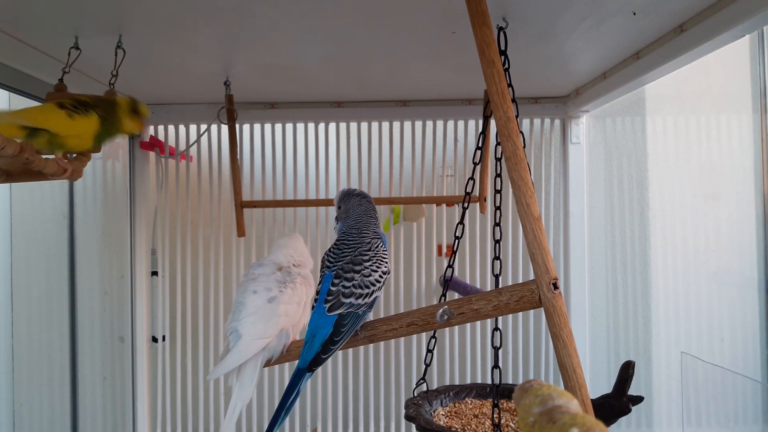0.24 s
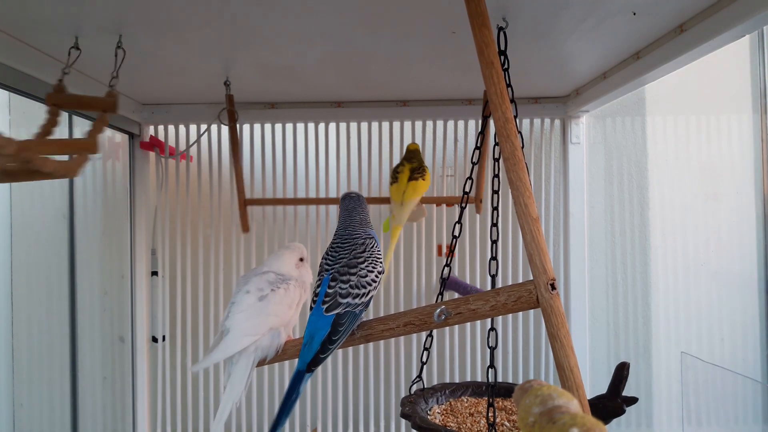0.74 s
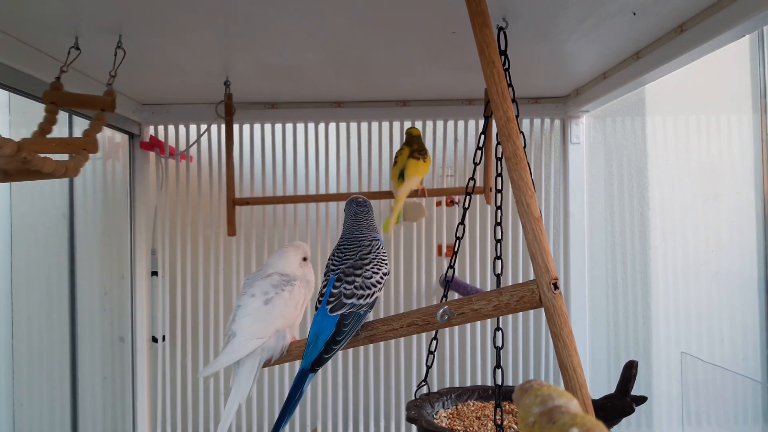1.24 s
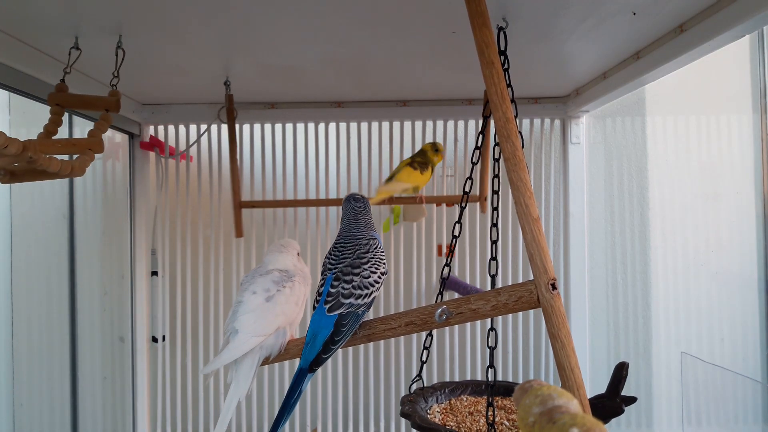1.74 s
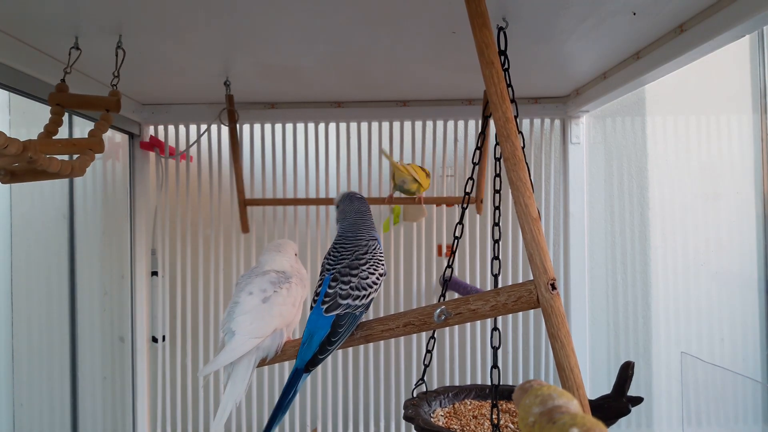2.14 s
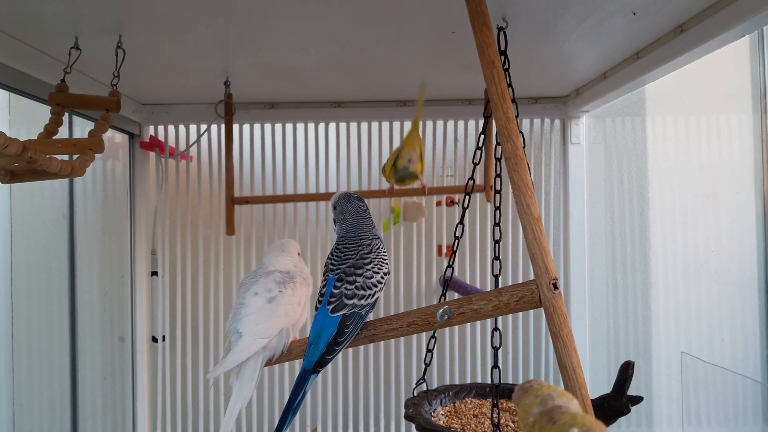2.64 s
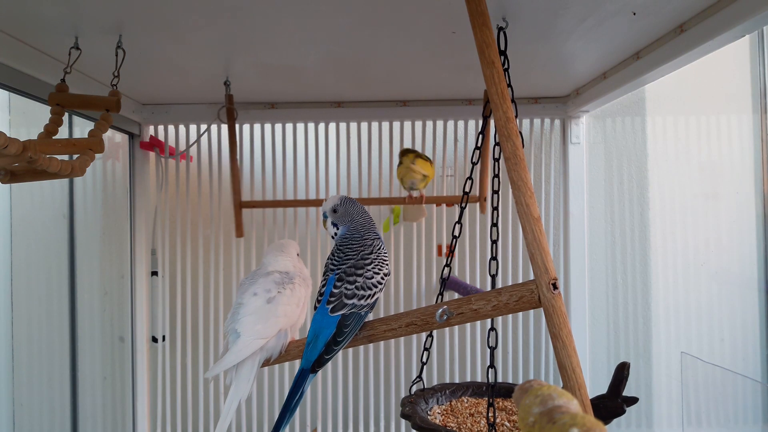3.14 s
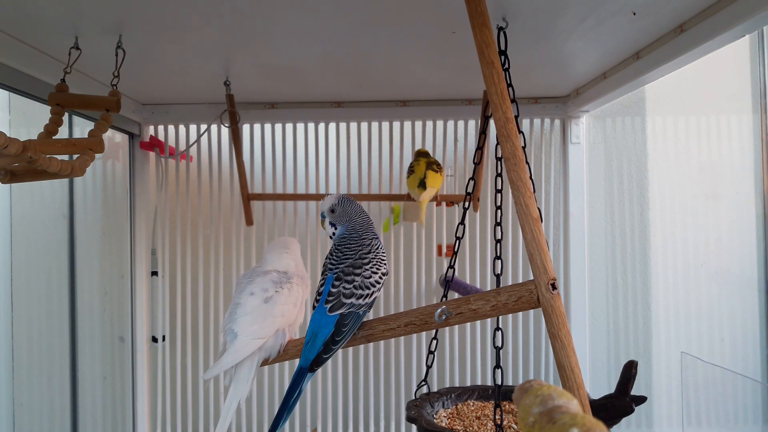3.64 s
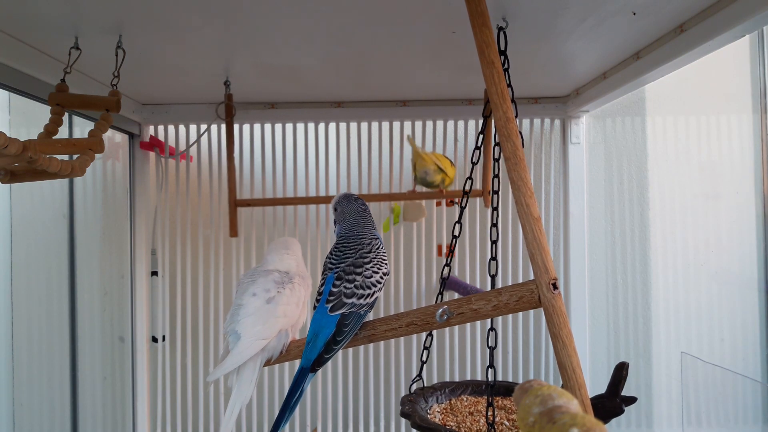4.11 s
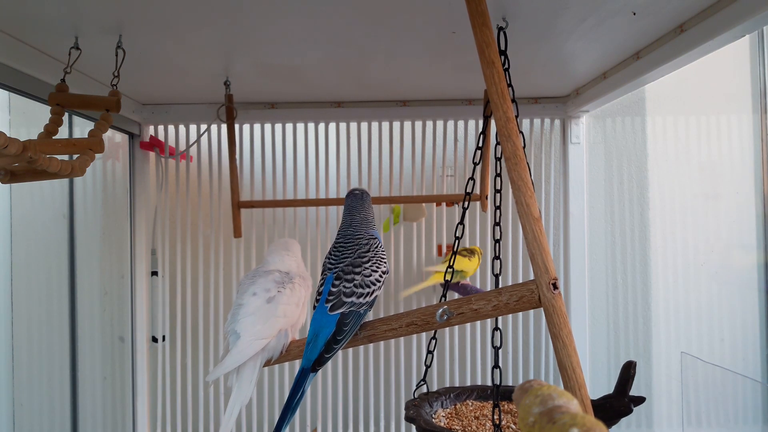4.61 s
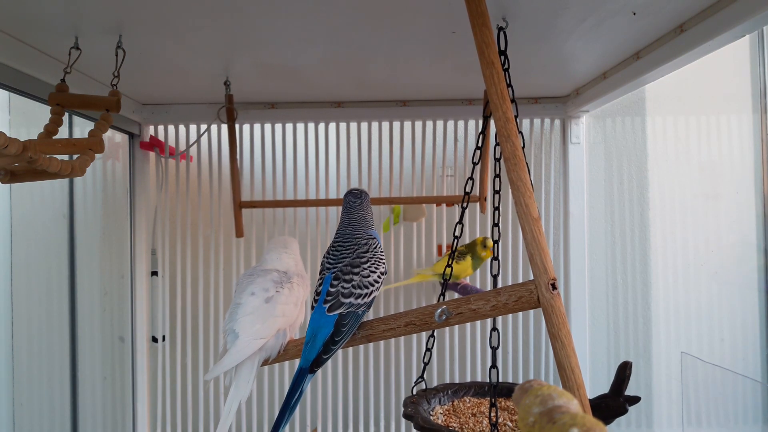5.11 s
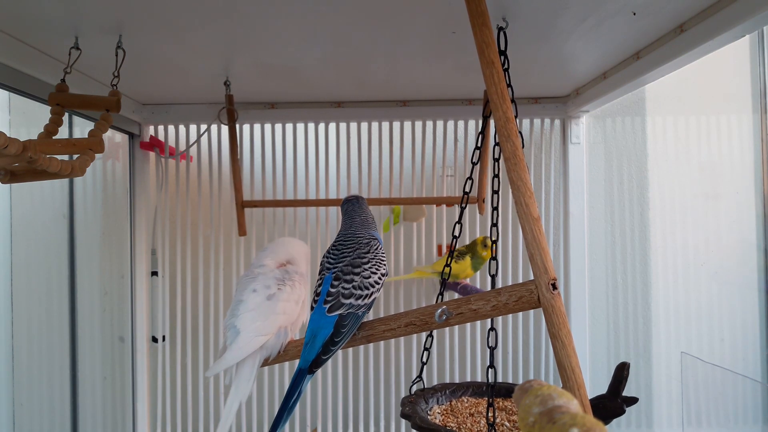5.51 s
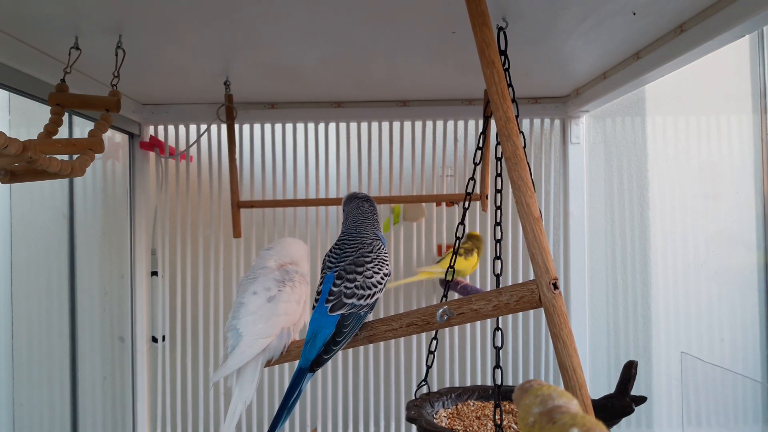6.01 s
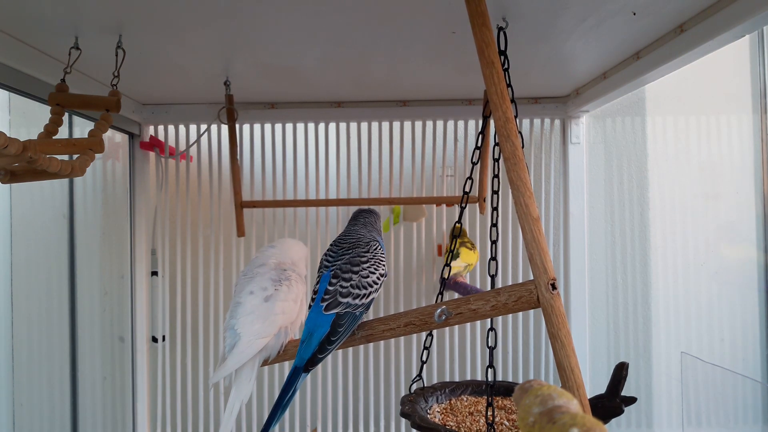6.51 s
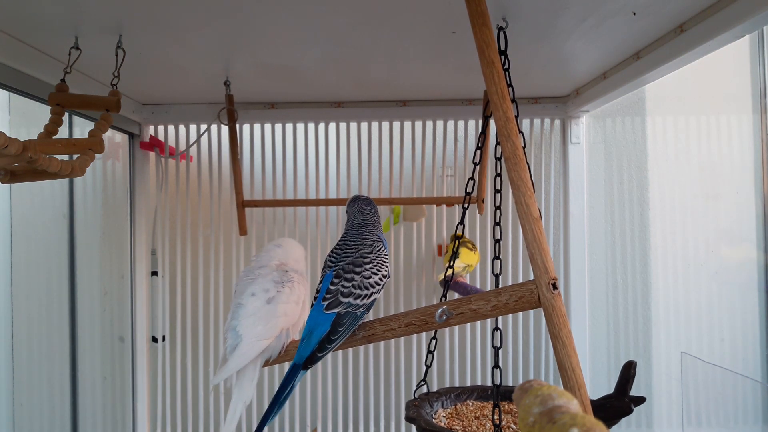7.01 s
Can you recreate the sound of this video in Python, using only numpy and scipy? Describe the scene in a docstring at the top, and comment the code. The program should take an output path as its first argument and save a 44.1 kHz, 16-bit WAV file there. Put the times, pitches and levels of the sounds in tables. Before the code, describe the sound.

Feathers flutter for under half a second, ending in a clear rap on a wooden perch amid clicking claws and faintly ringing wires. The rustle dies to a quiet low hum. Short gliding, buzzy parakeet chirps follow in small clusters, separated by soft perch taps and dull booms. The indoor space is tight, with a very short reverberation and slight microphone hiss.

```python
"""Budgerigars in a small aviary

A bird flies to a perch with soft wingbeats: bursts of feather hiss and dull pushes of air.
Claws and wires tick as cracks of noise with a faint ring, and wooden perches knock and boom.
Later come short warbled chirps, gliding tones roughened into a buzz. Grainy noise makes the rustling.
A motor hums as wavering tones under the room's hush, and close hard walls add a short tail."""
import sys
import numpy as np
from scipy import signal
from scipy.fft import rfft, irfft
from scipy.io import wavfile
from scipy.ndimage import uniform_filter1d

SR = 44100
rng = np.random.default_rng(int(sys.argv[2]) if len(sys.argv) > 2 else 0)


def bounce(signal):
    """Save signal as a 16-bit WAV file at the path given by the first command-line argument."""
    frames = np.transpose(np.atleast_2d(signal))
    limited = np.clip(frames, -1, 1)
    pcm = np.round(limited * 32767).astype(np.int16)
    wavfile.write(sys.argv[1], SR, pcm)


N = 320166
T = np.arange(N) / SR  # seconds
TOP_HZ = 15620  # highest pitch let through


def chirps():
    """A gliding, throbbing tone; an unsteady voice organ spreads it into a buzz, and air hisses past."""
    # sung notes: (start_s, length_s, first_pitch_hz, last_pitch_hz, level_db, swell_over_note_db,
    #  second_partial_db, higher_partials_db, roughness 0-1, throb_depth 0-1)
    notes = [(2.414, 0.25, 3780, 3600, -70.5, -3, -26, -19, 0.14, 0.1),
             (3.099, 0.024, 2744, 2736, -43, 13, -13, -16, 0.14, 0.25),
             (3.119, 0.017, 2930, 2770, -32.5, 0, -35, -29, 0.26, 0.3),
             (3.13, 0.054, 2549, 2523, -38, -23.5, -35, -29, 0.03, 0),
             (3.155, 0.041, 3170, 3144, -37.5, -6, -25, -27, 0.77, 0.02),
             (3.194, 0.025, 2097, 2040, -30, -3, -24, -35, 0.63, 0.5),
             (3.213, 0.023, 1810, 1680, -36.5, -24, -36, -33, 0.38, 0.4),
             (3.3, 0.053, 1684, 1634, -34.5, -8, -25.5, -16, 0.03, 0.1),
             (3.347, 0.036, 1657, 1672, -37.5, -1, -20.5, -24, 0, 0),
             (3.377, 0.013, 1650, 1400, -37, -2, -17, -17.5, 0, 0.1),
             (3.387, 0.022, 1403, 1390, -41, -16, -11.5, -19, 0.05, 0.45),
             (3.738, 0.051, 1230, 1271, -37.5, 1, -0.5, -15, 0.06, 0.44),
             (3.789, 0.034, 1823, 1723, -30.5, -5, -15.5, -32.5, 0.3, 0.52),
             (5.327, 0.048, 2970, 2940, -41, 0, -29, -44, 0.08, 0),
             (5.351, 0.048, 2435, 2470, -30.5, 5, -26, -34.5, 0.05, 0.78),
             (5.381, 0.04, 3340, 3210, -42.5, -12, -16.5, -41, 0.7, 0),
             (5.419, 0.022, 1907, 2410, -26.5, 6, -32, -41, 0.66, 0.56),
             (5.438, 0.015, 1900, 1830, -35, -9, -25, -40, 0.2, 0.39),
             (5.489, 0.036, 1744, 1780, -36, 9, -17, -8, 0.3, 0),
             (5.522, 0.032, 2537, 2770, -33.5, -19, -16, -16, 0.9, 0.04),
             (5.524, 0.033, 2055, 2050, -29.5, -14, -12.5, -25, 0.49, 0.3),
             (5.534, 0.012, 1440, 1500, -33.5, -17, -11, -6, 0.09, 0.9),
             (5.567, 0.025, 3790, 3600, -36.5, -1, -12, -24, 0.26, 0.2),
             (5.583, 0.0446, 3392, 3036, -35.5, -15, -13.5, -23, 0.96, 0),
             (5.605, 0.017, 3100, 2810, -35, -5, -34.5, -23.5, 0.3, 0),
             (5.628, 0.083, 3450, 3420, -53.5, -15, -27, -24, 0, 0.39)]
    throb_hz, rasp_hz, rasp_rise_hz = 81, 206, 187  # the rasp quickens with roughness
    partial_fall_db = -4.5  # for each partial above the third
    air_db, air_follows = -6.5, 0.65  # the hiss rises with the higher partials
    dip_hz, dip_width_hz, dip_db = 4900, 180, -0.5  # partials near this pitch are a little weaker
    lag_s, pan_db = 0.0003445, 0.4  # the tones lead at the left microphone
    out = np.zeros((2, N))
    for start, length, hz0, hz1, db, swell_db, second_db, high_db, rough, depth in notes:
        n = int(length * SR)
        u = np.arange(n) / n  # progress through the note, 0 to 1
        pitch = (hz0 + (hz1 - hz0) * u) * (1 + 0.0085 * walk(165, n))
        phase = 2 * np.pi * np.cumsum(pitch) / SR

        throb = 1 - np.clip(depth, 0, 1) * np.cos(np.pi * throb_hz * length * u) ** 2
        edges = np.minimum(1, np.minimum(u, 1 - u) * length / 0.0056)  # fades of 5.6 ms
        shape = np.sin(np.pi / 2 * edges) ** 2 * undb(swell_db * (u - .5)) * throb

        # a second, slower vibration swings the pitch and sets sidebands round every partial
        rasp = (rasp_hz + rasp_rise_hz * rough) * (1 + 0.12 * walk(195, n))
        swing = np.sin(2 * np.pi * np.cumsum(rasp) / SR)

        air_points = [(1500, -18), (3500, -1), (8000, -4.5), (13000, -3)]  # (pitch_hz, level_db)
        air = unit(colour(rng.standard_normal((2, n)), air_points))
        x = undb(air_db + air_follows * high_db) * air
        partials_db = np.r_[0, second_db, high_db + partial_fall_db * np.arange(5)]
        for k, partial_db in enumerate(partials_db, 1):
            if k * hz0 >= TOP_HZ:
                continue
            partial_db = partial_db + dip_db * np.exp(-((k * hz0 - dip_hz) / dip_width_hz) ** 2)
            share = np.clip(rough + 0.18 * (k - 1), 0, 1)  # overtones buzz the most
            jitter = walk(900, n) + 1j * walk(900, n)
            buzz = 0.45 * np.exp(1j * 1.49 * swing) + 0.53 * jitter
            flutter_db = min(k, 3) * walk(90, n)
            carrier = undb(partial_db + flutter_db) * (np.sqrt(1 - share) + np.sqrt(share) * buzz)
            lead = np.array([[2 * np.pi * k * hz0 * lag_s], [0]])
            x = x + np.sqrt(2) * np.real(carrier * np.exp(1j * (k * phase + lead)))
        add(out, start, undb(db) * shape * x, pan_db)
    return out


def wings():
    """Each downstroke is a swell of feather hiss and a dull push of air."""
    # wing downstrokes: (start_s, feather_hiss_db, air_thump_db)
    downstrokes = [(0.438, -45.5, -45), (0.4903, -52, -37.5), (0.552, -47.5, -32.5), (0.606, -45.5, -38.5),
                   (0.6554, -44, -38), (0.737, -39, -60), (0.809, -40.5, -42), (0.8644, -50, -51)]
    # colour of the feather hiss: (pitch_hz, level_db)
    feather_colour = [(880, -46), (1500, 14), (4370, 1), (5260, 2.5), (7720, -36), (9120, -58),
                      (12000, -29), (15600, 2)]
    hiss, thump = np.zeros((2, N))
    for start, hiss_db, thump_db in downstrokes:
        hiss += undb(hiss_db) * np.exp(-((T - start - .012) / 0.022) ** 2)
        thump += undb(thump_db) * np.exp(-((T - start - .01) / 0.019) ** 2)
    return hiss * wide_noise(feather_colour) + thump * wide_noise(band(52, 295, -31.5))


def ticks():
    """A short crack coloured round its own pitch, with a faint ring of wires; the bustle scatters small ones."""
    # the clearest claw and wire ticks: (start_s, level_db, pitch_hz)
    clear_ticks = [(0.1673, -50, 3200), (0.24, -44, 4130), (0.4056, -40.5, 6200), (0.449, -41, 3190),
                   (0.5086, -34, 4100), (0.5627, -39, 2840), (0.619, -40, 3060), (0.7105, -36.5, 3200),
                   (0.7369, -28.5, 2820), (0.7464, -35.5, 2950), (0.818, -32.5, 3900),
                   (0.8331, -35.5, 3260), (0.8643, -33, 6040), (0.945, -53, 6600), (0.9807, -42, 3450),
                   (1.014, -38, 4400), (1.096, -46.5, 4100), (1.118, -42, 4000), (1.1492, -38, 4060),
                   (1.1814, -38.5, 4130), (1.2, -41.5, 3050), (1.24, -42.5, 3380), (1.2608, -51, 6500),
                   (1.367, -46, 2600), (1.5451, -35, 4140), (1.5894, -54, 2860), (1.827, -44.5, 3920),
                   (2.174, -50.5, 5830), (2.6613, -49, 2640), (2.8326, -52.5, 3800), (3.469, -49, 3380),
                   (4.163, -51.5, 2600), (4.2735, -52, 2490), (4.365, -48, 4470), (4.439, -42, 2560),
                   (4.4885, -49.5, 3500), (4.5094, -43.5, 2460)]
    # ringing tones of the cage wires: (pitch_hz, level_db, ring_s to fall 60 dB)
    wire_tones = [(2920, -14, .08), (3850, -8, .07), (4900, -12, .09), (6000, -18, .08), (7300, -18, .09)]
    crack_s, pan_db = 0.043, -0.3  # time to fall 60 dB; average lean, very slightly to the right
    strays_per_s, stray_db = 14, -1  # small ticks while a bout is on; level over the bustle
    out = np.zeros((2, N))
    t = np.arange(int(.2 * SR)) / SR
    body, _, on = busy()
    at = np.flatnonzero(rng.random(N) < on * strays_per_s / SR)
    strays = []
    for i in at:
        level_db = body[i] + stray_db + 3 * rng.standard_normal()
        strays.append((i / SR, level_db, rng.uniform(2500, 4100)))

    snap = (1 - np.exp(-t / 0.00084)) * undb(-60 * t / crack_s)
    for start, db, hz in list(clear_ticks) + strays:
        points = [(hz / 3, -16), (hz / 2.8, -7), (hz, 0), (hz * 1.31, -7), (hz * 1.37, -20)]
        crack = burst(points, snap)
        wires = undb(-9.5) * ring(wire_tones, t, spread_db=4)
        add(out, start, undb(db) * (crack + wires), pan_db + 3.6 * rng.standard_normal())
    return out


def knocks():
    """A foot lands: a dry rap, a short ring and shake of the perch, and a boom of the panel below."""
    # knocks on the wooden perches: (start_s, level_db, pitch_hz, low_boom_db)
    landings = [(0.747, -20, 794, -23), (0.818, -30.5, 694, -30), (1.016, -38.5, 1080, -46),
                (1.122, -40.5, 414, -30), (1.546, -40, 430, -33.5), (1.765, -52, 511, -27.5),
                (2.179, -39, 720, -41), (2.24, -42.5, 729, -47), (2.662, -44, 480, -58),
                (3.204, -39.5, 716, -26), (3.248, -43.5, 630, -40), (3.356, -43.5, 570, -35.5),
                (3.471, -40, 820, -45), (4.199, -42.5, 725, -50), (4.288, -38, 744, -32),
                (4.328, -42, 726, -37), (4.365, -35, 545, -32.5), (4.492, -34.5, 780, -33.5),
                (5.847, -54, 490, -38), (7.234, -59, 506, -39.5)]
    # ringing tones of the perch: (pitch_hz, level_db, ring_s to fall 60 dB)
    perch_tones = [(500, -2, .05), (635, -5, .035), (775, 0, .07), (1100, -7, .03), (1400, -6, .04),
                   (2300, -10, .02)]
    # ringing tones of the panel under the perch: (pitch_hz, level_db, ring_s to fall 60 dB)
    panel_tones = [(171.2, -4, 0.12), (221.8, 0, 0.14)]
    pan_db, shake_db, shake_s = -2, -13, 0.16  # the perch shakes on after a knock
    out = np.zeros((2, N))
    t = np.arange(int(.3 * SR)) / SR
    touch = 1 - np.exp(-t / .0007)
    push = 1 - np.exp(-t / 0.012)  # the panel answers more softly
    rap_shape = touch * (undb(-60 * t / 0.091) + 1.72 * np.exp(-t / 0.0024))
    shake_shape = touch * undb(shake_db - 60 * t / shake_s)
    for start, db, hz, boom_db in landings:
        rap = burst(band(hz / 1.15, hz * 1.006, -46), rap_shape)
        rap = 0.41 * rap + .5 * rap[::-1]  # both microphones hear much the same blow
        shake = burst(band(410, 1570, -21), shake_shape)
        perch = undb(-0.5) * touch * ring(perch_tones, t, spread_db=4.5)
        add(out, start, undb(db) * (undb(-5) * rap + perch + shake), pan_db)
        add(out, start, undb(boom_db) * push * ring(panel_tones, t, spread_db=10), 0)
    return out


def bustle():
    """Four bands of rustle; feathers and claws on wood crackle in grains over a wandering rumble."""
    rustle_db, treble_db, rumble_db = -3.5, -2.5, 2  # over the bustle's level
    rustle_follows = 0.44  # share of the brightness that the rustle takes
    body, bright, on = busy()
    crackle = grains(130, spread_db=3.0)
    treble = [(3000, -1), (6000, 1.5), (9000, -1), (12000, 6.5), (15500, 3)]  # (pitch_hz, level_db)
    layers = [(body, band(370, 1300, -31.5), grains(200, spread_db=3.0)),
              (body + rustle_db + rustle_follows * bright, band(1700, 4600, -46.5), crackle),
              (body + treble_db + bright, treble, np.sqrt(crackle)),
              (body + rumble_db, band(110, 382, -43), undb(2.0 * walk(40)))]
    return on * sum(undb(db) * texture * wide_noise(points) for db, points, texture in layers)


def busy():
    """Give the bustle's level in dB, its brightness in dB, and whether a bout is on (0 to 1)."""
    # bouts of bustle of feathers, claws and swaying perches: lists of (start_s, level_db, brightness_db)
    bouts = [
        [(0.12, -77, -10), (0.25, -56.5, -18), (0.395, -68, 5), (0.408, -59.5, 10), (0.435, -46.5, -5),
         (0.6, -43, -2.5), (0.72, -43, -7), (0.83, -41, -14), (0.9, -52, -15), (1.05, -55.5, -14),
         (1.15, -46.5, -16), (1.42, -62.5, -11)],
        [(3.43, -53, -14), (3.48, -62, -10.5), (3.54, -66.5, -14), (3.62, -52.5, -37), (3.68, -72, -27)],
        [(4.1, -70, -20), (4.29, -58.5, -24), (4.432, -68.5, 5), (4.441, -52.5, 6), (4.51, -58.5, 0),
         (4.65, -71, -11)],
    ]
    start, level_db, bright_db = np.vstack(bouts).T
    on = sum((T > bout[0][0]) & (T < bout[-1][0]) for bout in bouts) * 1.
    on = uniform_filter1d(on, size=1500)  # soft edges
    return np.interp(T, start, level_db), np.interp(T, start, bright_db), on


def hush():
    """Room noise that slowly settles, with wavering motor tones."""
    # colour of the room noise: (pitch_hz, level_db)
    hush_colour = [(15, -63), (25, -21.5), (63, -8.5), (219, -6), (252, -20.5), (290, 3), (334, -10.5),
                   (423, -10.5), (549, -13), (900, -15.5), (1410, -22), (2050, -24), (7000, -48.5),
                   (9100, -53), (15400, -120)]
    # motor hum: (pitch_hz, level_db, waver_hz)
    motor_tones = [(71.3, -78.5, 6.9), (133.7, -71.5, 6.6), (223, -67, 5.01), (287.8, -66, 13),
                   (370, -79.5, 3), (510.6, -70, 4.02), (1213, -77, 0.66), (1354, -75.5, 1.31),
                   (2070, -75.5, 1.09), (2495, -78, 0.95)]
    rest_db, stir_db, settle_s = -56.5, 4.5, 8.7  # resting level; extra at the start, and how slowly it fades
    out = undb(rest_db + stir_db * np.exp(-T / settle_s)) * wide_noise(hush_colour)
    for hz, tone_db, waver_hz in motor_tones:
        waver = 1.0 + .5 * (walk(waver_hz) + 1j * walk(waver_hz))
        # the spacing of the microphones turns higher tones further apart, up to a limit
        lead = np.array([[min(hz / 600, 2.2)], [0]])
        tone = np.real(waver * np.exp(1j * (2 * np.pi * hz * T + lead)))
        out = out + undb(tone_db) * np.sqrt(2) * tone
    return out


def room(x):
    """Hard walls close by add a dense fading tail, different at each microphone above the bass."""
    fade_s, room_db = 0.21, -8.5  # time to fall 60 dB; level of the tail
    t = np.arange(int(.5 * SR)) / SR
    fade = undb(-60 * t / fade_s)
    low = wide_noise([(100, -3), (1000, -5), (3500, -7.0), (6000, -52)])[:, :len(t)] * fade
    high = wide_noise([(2500, -14.5), (5000, 0), (14000, -29.5)])[:, :len(t)] * undb(-4.5) * fade
    tail = unit((low + high) * np.minimum(t / 0.0045, 1)) / np.sqrt(len(t))
    return x + undb(room_db) * signal.fftconvolve(x, tail, axes=1)[:, :N]


def undb(db):
    """Turn decibels into a plain factor."""
    return 10 ** (np.asarray(db) / 20)


def unit(x):
    """Scale to an average strength (rms) of 1."""
    return x / np.sqrt(np.mean(np.abs(x) ** 2))


def colour(x, points):
    """Filter by (pitch_hz, level_db) points joined on a log pitch axis."""
    hz, db = np.transpose(points)
    bins = np.maximum(np.fft.rfftfreq(x.shape[-1], 1 / SR), 1)
    gain = undb(np.interp(np.log(bins), np.log(hz), db))
    return irfft(rfft(x) * gain, x.shape[-1])


def wide_noise(points):
    """Coloured noise, alike at both microphones in the bass and mostly unrelated in the treble."""
    # how wide spread-out sound is: (pitch_hz, side_minus_mid_db)
    width_points = [(60, -22), (110, -18.5), (200, -17), (380, -8), (700, -2.5), (1290, 2.5), (2380, 0),
                    (4400, -0.5), (8120, 0.5), (15000, -0.5)]
    mid, side = colour(rng.standard_normal((2, N)), points)
    side = colour(side, width_points)
    return np.array([mid + side, mid - side]) / np.std(mid)


def band(lo_hz, hi_hz, skirt_db):
    """Points of a pitch band with sloping skirts an octave wide."""
    return [(lo_hz / 2, skirt_db), (lo_hz, 0), (hi_hz, 0), (hi_hz * 2, skirt_db)]


def walk(rate, count=N):
    """Smooth random wander, about `rate` turns a second, spread about 1."""
    k = max(int(SR / rate), 1)
    steps = np.repeat(rng.standard_normal(count // k + 3), k)
    return 1.53 * uniform_filter1d(uniform_filter1d(steps, k), k)[k:k + count]


def add(out, start, x, pan_db):
    """Mix a short sound in at a start time; a positive pan leans left."""
    i = int(start * SR)
    x = x * undb(np.array([[pan_db], [-pan_db]]) / 2)
    out[:, i:i + x.shape[1]] += x[:, :N - i]


def ring(modes, t, spread_db):
    """Fading tones; every blow shares its energy out anew and shifts each pitch a little."""
    hz, db, ring_s = np.transpose(modes)[:, :, None]
    level_chance, pitch_chance = rng.standard_normal((2, len(modes), 1))
    level = undb(db + spread_db * level_chance - 60 * t / ring_s)
    tones = level * np.sin(2 * np.pi * hz * (1 + 0.023 * pitch_chance) * t)
    x = tones.sum(axis=0)
    return x / np.abs(x).max()


def grains(rate, spread_db):
    """Scattered short bursts of uneven size, `rate` a second, over a steady base, rms 1."""
    when, size = rng.random((2, N))
    hits = (when < rate / SR) * undb(-spread_db * np.log(1 - size))
    fade = np.exp(-1 / (0.0096 * SR))
    return unit(1.3 + signal.lfilter([1], [1, -fade], hits))


def burst(points, envelope):
    """Coloured noise under an envelope, holding the envelope's energy at each microphone."""
    x = colour(rng.standard_normal((2, len(envelope))), points) * envelope
    return x * np.sqrt(np.sum(envelope ** 2) / np.sum(x ** 2, axis=1, keepdims=True))


def scene():
    """Put chirps, ticks and knocks in the room, then add wings, bustle and hush."""
    return room(chirps() + ticks() + knocks()) + wings() + bustle() + hush()


def record(dry):
    """The microphones dip near 10 kHz, the left favours the treble, both hiss, and the top is cut steeply."""
    # response of the microphone openings: (pitch_hz, level_db)
    opening = [(20, -11), (45, 0), (6000, -1), (8000, -5.5), (9800, -13), (12000, -8.5), (16000, -14.5)]
    # difference between the two openings: (pitch_hz, left_minus_right_db)
    left_lean = [(200, -0.5), (400, -1), (4000, -1.5), (5000, -3), (6300, 1.5), (7800, 11.5), (9300, 9),
                 (11200, 7), (13500, 4)]
    # colour of the microphone hiss: (pitch_hz, level_db)
    hiss_colour = [(2350, -41), (4000, 0), (5900, -11), (6650, -10), (8020, -10.5), (9100, -13),
                   (12800, -4), (15600, -3.5)]
    hiss_db = -73.5
    hz, lean_db = np.transpose(left_lean)
    sides = [colour(x, np.transpose([hz, sign * lean_db / 2])) for x, sign in zip(dry, (1, -1))]
    heard = colour(np.array(sides), opening) + undb(hiss_db) * wide_noise(hiss_colour)
    return signal.sosfilt(signal.ellip(10, .2, 70, TOP_HZ, fs=SR, output="sos"), heard)


dry = scene()
out = record(dry)
bounce(out)
```